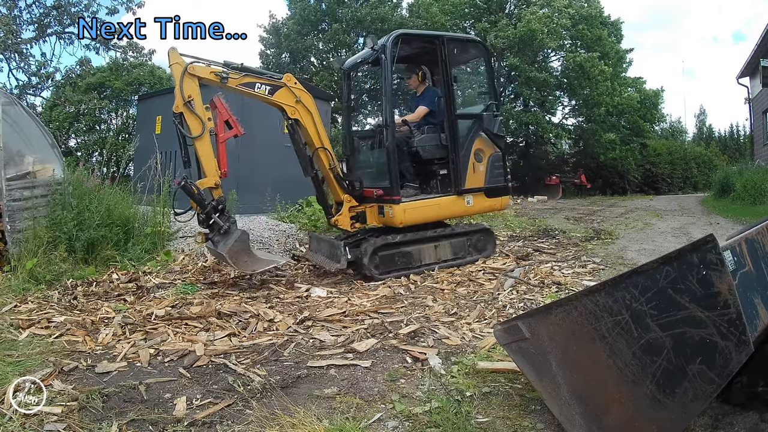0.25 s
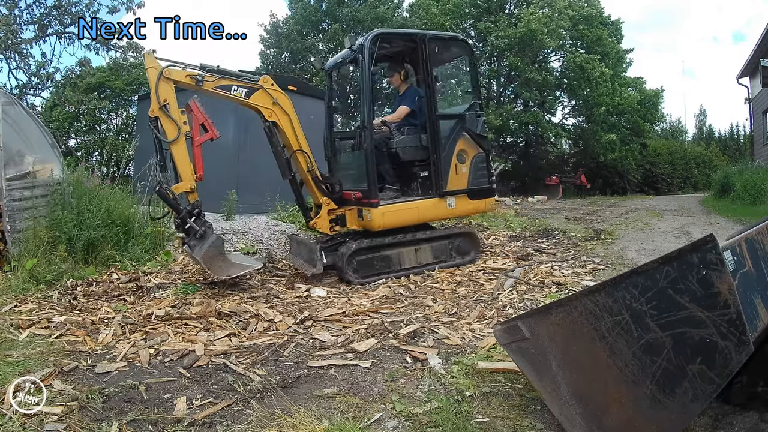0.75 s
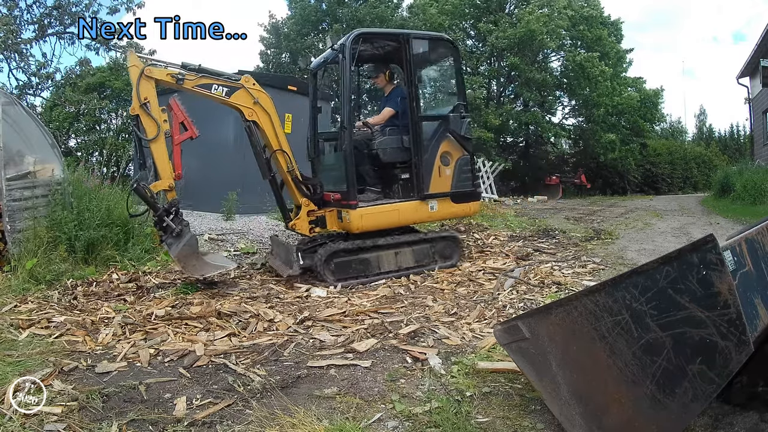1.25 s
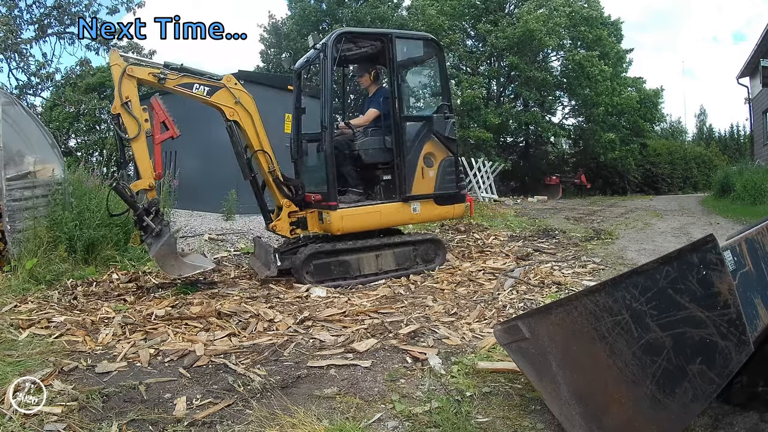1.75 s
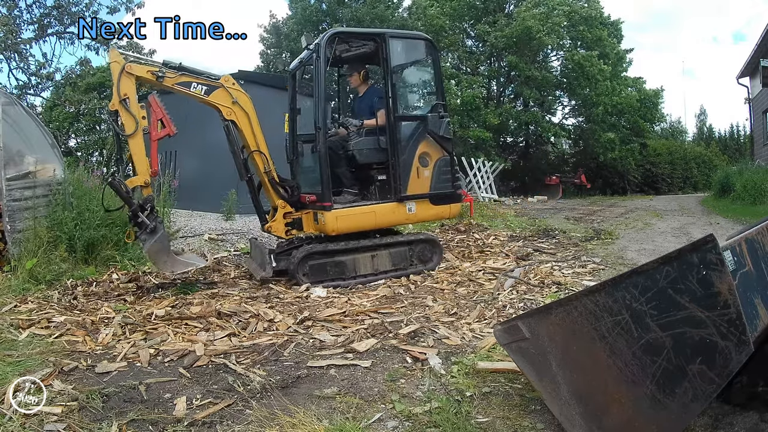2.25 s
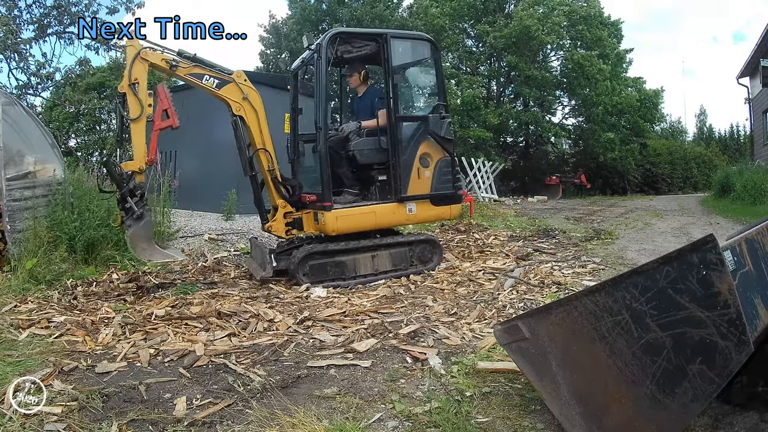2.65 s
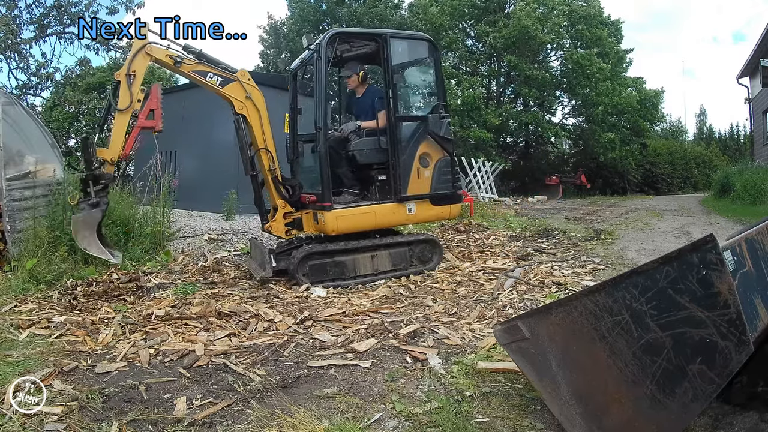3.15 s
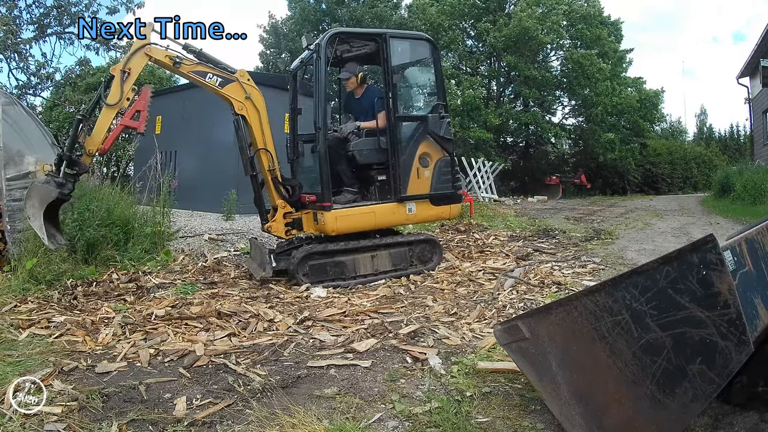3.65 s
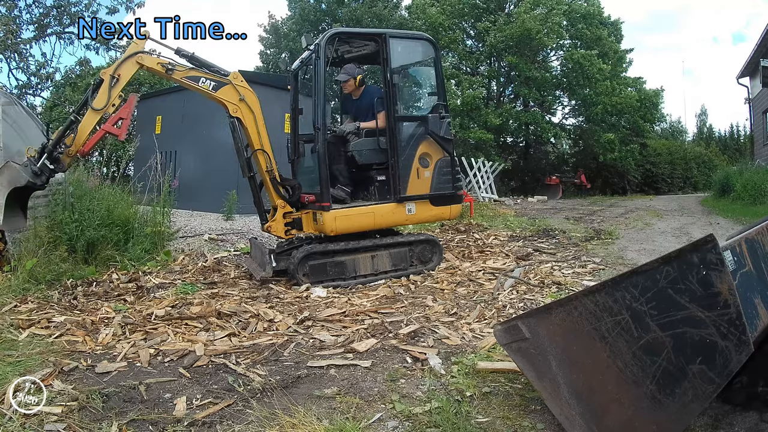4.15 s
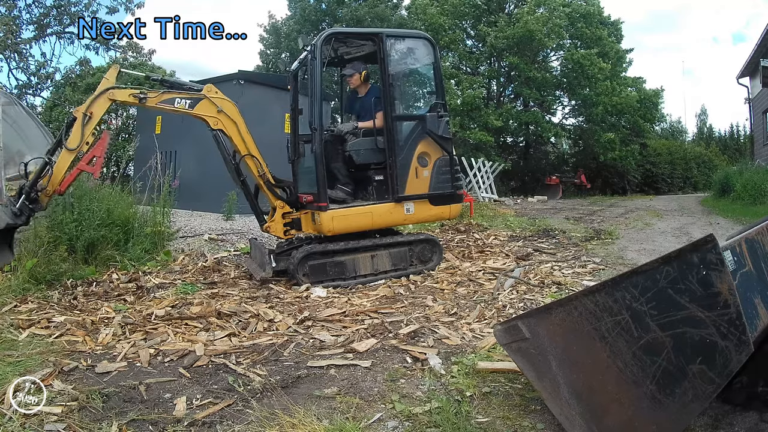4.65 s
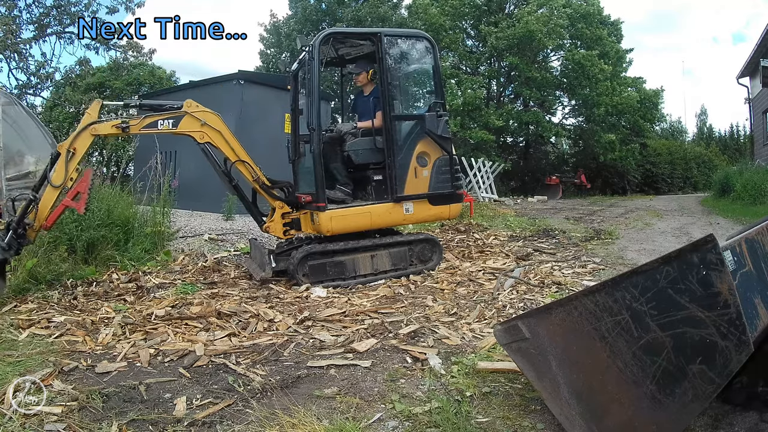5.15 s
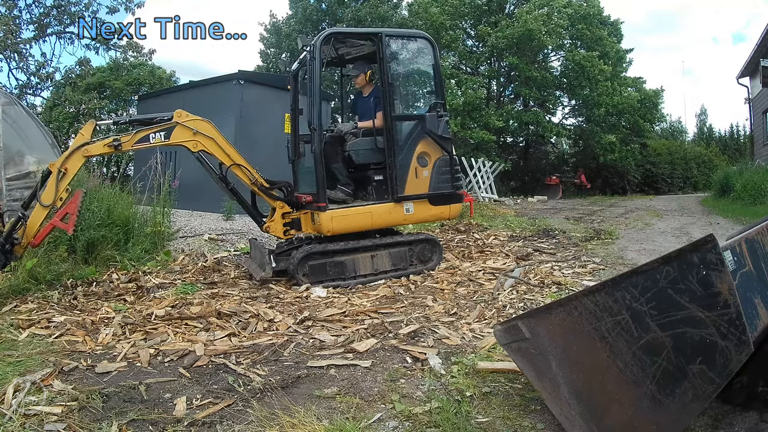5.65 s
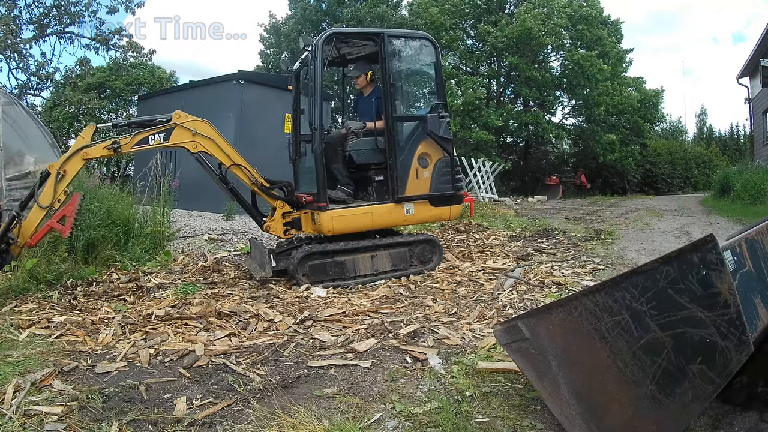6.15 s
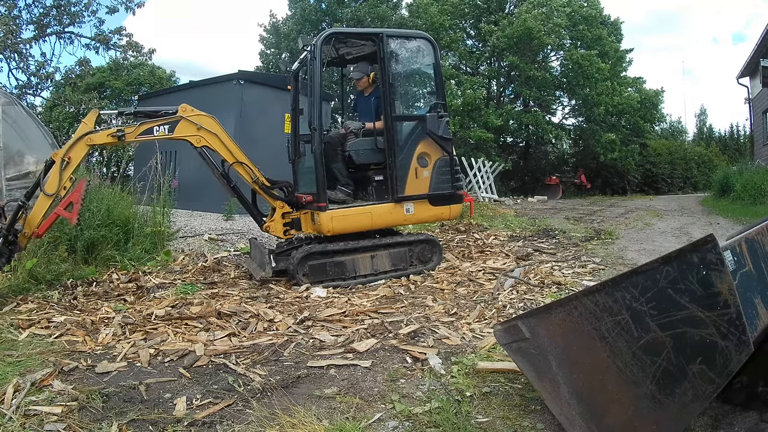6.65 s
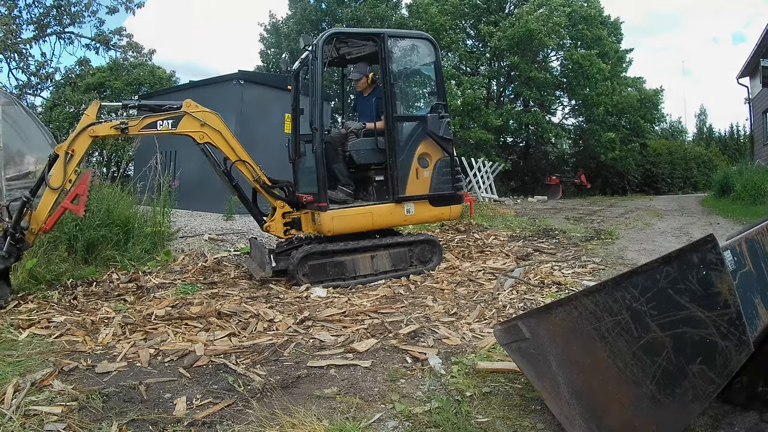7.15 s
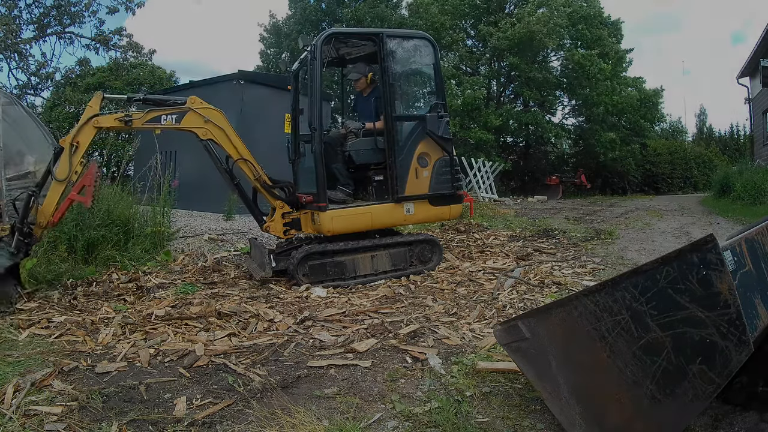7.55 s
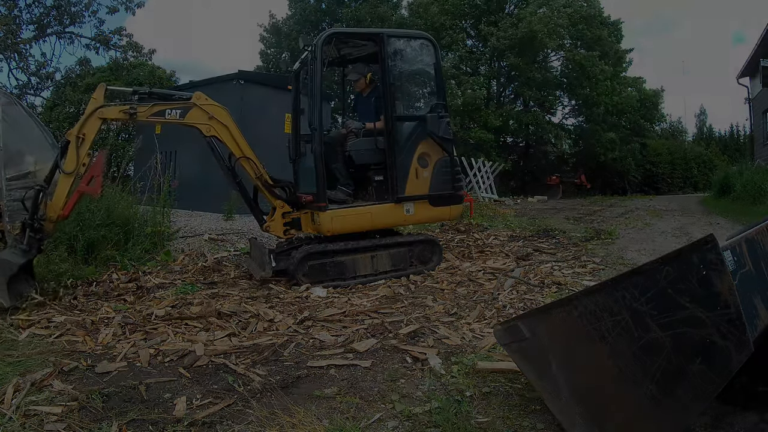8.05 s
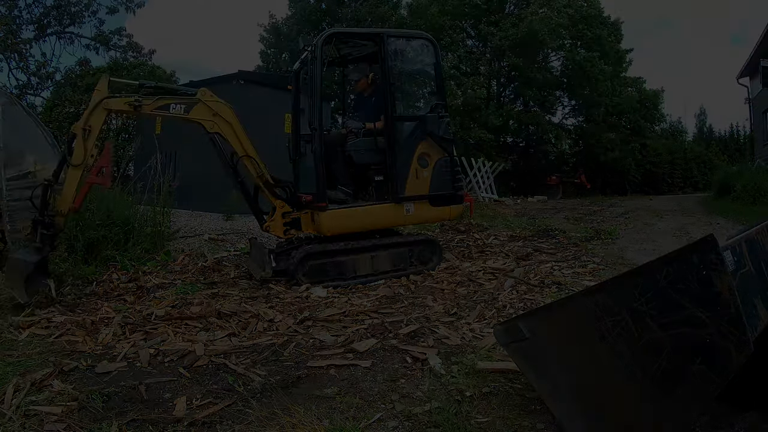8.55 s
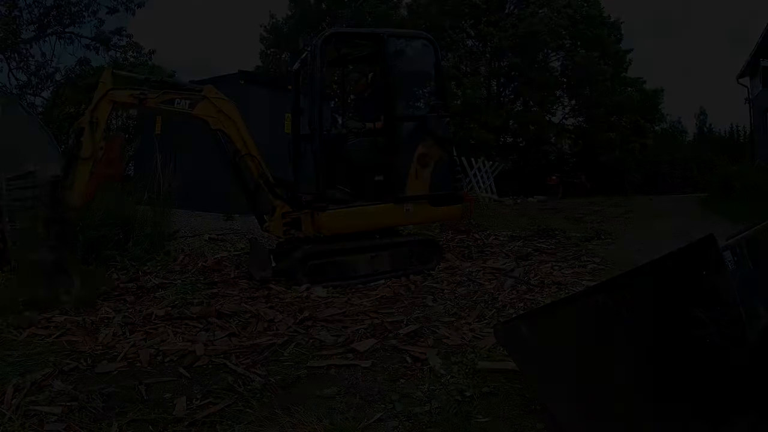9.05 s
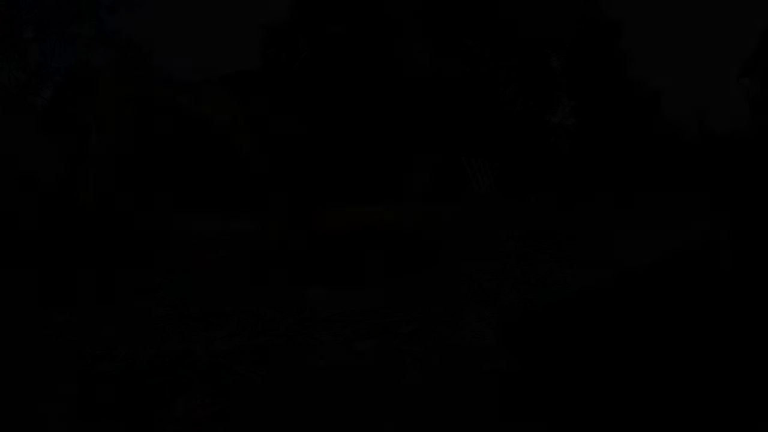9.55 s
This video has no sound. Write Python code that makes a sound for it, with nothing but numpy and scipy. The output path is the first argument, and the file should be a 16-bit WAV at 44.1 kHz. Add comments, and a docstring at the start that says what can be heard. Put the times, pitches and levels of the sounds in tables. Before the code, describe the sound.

Outdoors, a compact digger's diesel clatters at a steady medium-low speed, dipping slightly under load. Over the first two seconds splintering wood, hollow board knocks and loose steel links sound under the bucket. Soon after, the bucket rattles and clanks on its pins with dull boom thumps. The engine then carries on almost alone, with soft jolts and weak rattles later, and fades nearly to silence. Heard from nearby, fairly dry, with slight reflections from sheds and trees.

```python
"""A three-cylinder diesel excavator works in a yard; everything is built from tones and filtered noise.
From the start the exhaust sounds as tones of the engine cycle; the engine knocks and rings, the frame rumbles.
In the first seconds scraps of wood crack and knock under the raking bucket and loose steel links clink.
From 2.6 s the bucket clanks on its pins as it lifts, as noise and steel modes, with two low boom thumps.
Near 4.7 s a valve hisses faintly; late clanks follow, and the sound fades from 7.3 s, not quite to silence."""
import sys
import numpy as np
from scipy import signal
from scipy.fft import rfft, irfft
from scipy.io import wavfile
from scipy.ndimage import uniform_filter1d

SR = 44100
rng = np.random.default_rng(int(sys.argv[2]) if len(sys.argv) > 2 else 0)


def to_wav(sig):
    """Store sig (one row per channel, or 1-D mono) as 16-bit WAV at the path in sys.argv[1].

    Samples outside -1..1 are clipped; the rate is SR.
    """
    pcm = np.clip(np.atleast_2d(sig), -1, 1) * 32767
    pcm = np.round(pcm).astype(np.int16)
    wavfile.write(sys.argv[1], SR, pcm.T)  # frames by channels


N = 431290
TIME = np.arange(N) / SR  # s

# Speed of the crankshaft: time_s, speed_rpm
CRANK_SPEED = [(0.0, 1407.4), (1.01, 1424.0), (1.16, 1383.6), (1.74, 1407.7), (2.1, 1506.9), (2.25, 1359.2),
               (2.55, 1418.1), (2.68, 1295.9), (2.85, 1370.2), (2.98, 1372), (3.11, 1347), (3.26, 1368),
               (3.42, 1353.5), (3.95, 1338.1), (4.32, 1400.3), (4.78, 1379.0), (4.98, 1402.0),
               (5.87, 1386.7), (6.05, 1462.5), (6.41, 1345.3), (6.9, 1398.2), (7.55, 1351.4),
               (7.82, 1375.8), (9.78, 1371.9)]
START_PLACE = -.068  # engine cycles
# The governor lets the revs droop under the pump's load, so the speed tells how hard the engine works.
WORKING_RPM, LOAD_DB_PER_RPM = 1393.6, 0.06
IDLE_DB, FULL_DB = -5, 3  # load with the pump unloaded, and at its relief pressure
# Exhaust tones before load and shading: order (multiple of the four-stroke cycle rate; firing is every third),
# level_db (rms), load_gain (share of the amplitude gained per dB of load)
EXHAUST_TONES = [(3, -40.5, -.1), (4, -47.5, .25), (5, -40.5, .28), (6, -17, .018), (7, -35, .12),
                 (8, -39, -.05), (9, -31.8, .33), (10, -52, 0), (11, -50, -.25), (12, -38.5, .2),
                 (13, -43.5, -.05), (14, -41, -.08), (15, -26.8, .13), (18, -43.7, .12), (19, -49.5, .1),
                 (21, -36.2, .07), (24, -38.8, .12), (25, -52, .06), (27, -46, .04), (30, -50, -.12),
                 (33, -44.5, -.03), (36, -52, .1), (45, -51, 0), (57, -53, 0)]
# The upper exhaust tones are shaded, less and less, until the cab has swung round.
SWING_S, SHADE_DB, SHADED_ORDER = 3.0, -8, 10.5  # shading sets in above this order, in full at twice it
# Blows in one engine cycle, levels relative: place_cycles, thud_db, knock_db, tick_db
CYCLE_BLOWS = [(.945, -3, -12, -14), (.05, -4, -8, -8), (.14, -12, -6, -9), (.3, -2, -5, -3),
               (.345, -4, -4, -8), (.45, -6, -7, -7), (.595, -4, -10, -12), (.64, -5, -2, -2),
               (.69, -3, -4, -8), (.755, -7, -6, -11)]
# Overall spectrum of the engine clatter, falling steeply above 5.2 kHz, relative:
# frequency_hz, density_db (per Hz)
CLATTER_SPECTRUM = [(100, -29), (220, -9.5), (330, -7), (400, -3), (465, -9), (620, -4), (780, -8.5),
                    (1300, -9.5), (2000, -12), (2500, -18), (3300, -25.5), (5200, -31), (5550, -40.5),
                    (9100, -40), (10300, -58)]
# Resonances and hollows of the covers: frequency_hz, width_hz, gain_db
COVER_RESONANCES = [(535, 63, 5), (640, 40, 5), (970, 25, 4.5), (1050, 60, 5), (1135, 30, 3),
                    (1290, 30, -1.5), (1430, 30, -1.5), (1510, 43, 7), (1590, 30, -2), (1820, 400, 3.3),
                    (2230, 50, -2.5), (2320, 60, 2.5), (2410, 50, -3), (2820, 220, 1.5), (3180, 100, -2),
                    (3880, 180, 4.8), (4044, 60, 3.5), (4330, 80, -3.5), (4700, 200, 3.5),
                    (4840, 100, -3.5)]
CLATTER_DB, CLATTER_PER_LOAD = -38.1, 0.43  # level at zero load, and dB gained per dB of load
# Engine parts that ring once a cycle, before load and scatter:
# place_cycles, frequency_hz, peak_db (relative), peak_ms (time to the peak)
PART_RINGS = [(.055, 4400, -59, 1.6), (.94, 550, -35.5, 3.2), (.3, 640, -34.5, 2.8), (.305, 1040, -40, 3.0),
              (.3, 2820, -47, 1.9), (.335, 5120, -58, 2.8), (.36, 1850, -43.5, 2.4), (.415, 760, -42, 3.0),
              (.585, 520, -40, 3.4), (.642, 1010, -33.8, 3.0), (.645, 2960, -49, 2.4),
              (.635, 4400, -57.5, 1.8), (.665, 5150, -57, 2.6), (.695, 1830, -37.7, 2.3),
              (.765, 2050, -37.7, 1.6)]
# The parts rattle as they ring: line width as a share of the pitch, growing with pitch up to this frequency.
RING_WIDTH, RING_WIDTH_HZ = .025, 3000
# Steady rumble of the frame, relative: frequency_hz, density_db (per Hz)
RUMBLE_COLOUR = [(12, -9), (28, 6), (75, 3.5), (125, 0.5), (175, -2.5), (260, -6), (450, -14), (900, -64.5),
                 (4000, -87)]
SHUDDER_DB, JOLT_RISE_S = -37.5, 0.075  # rms of the rumble; e-fold time of a jolt's growth
# Jolts as the boom starts and stops: peak_s, level_db, decay_s (e-fold time)
BOOM_JOLTS = [(0.348, -33, 0.41), (1.171, -26, 0.27), (2.17, -43, 0.2), (2.619, -21, 0.16),
              (5.598, -44, .4), (6.15, -33, 0.29), (6.42, -27, 0.53), (6.92, -29, 0.091)]
# Shaking under a jolt, relative: frequency_hz, density_db (per Hz)
SHAKING_COLOUR = [(12, -10), (28, 4), (55, -2), (85, 2), (140, 3), (200, 1), (280, -4), (450, -15),
                  (900, -60), (4000, -87)]
# Wood snapping and scraping under the bucket: start_s, level_db, centre_hz, spread_octaves, t60_s
WOOD_CRACKS = [(.233, -42, 2400, 0.38, .025), (.29, -30.5, 1000, 0.52, 0.12), (0.35, -34, 1380, 1.2, 0.062),
               (0.403, -37, 1490, 0.3, 0.2), (0.536, -32, 1400, 0.5, 0.07), (.598, -43, 2660, 0.62, 0.054),
               (.82, -36, 1200, 0.68, 0.035), (0.866, -40, 3230, 0.8, 0.1), (0.882, -22, 1500, 0.7, 0.03),
               (1.292, -29.5, 813, 0.65, 0.062), (1.436, -26, 1950, 0.45, 0.03),
               (1.598, -33, 1400, 0.68, 0.04), (1.657, -33.5, 900, 0.73, 0.099),
               (2.351, -31, 1100, 0.74, 0.045)]
SPLINTERS_PER_S = 3500
# Boards knocking together: start_s, level_db, pitch_hz, t60_s
BOARD_KNOCKS = [(.035, -32, 736, .05), (.072, -30, 790, .05), (.262, -18, 805, .055), (.404, -32, 1540, .1),
                (.432, -30, 2780, .065), (.498, -29, 860, .07), (.532, -26, 1120, .07),
                (.547, -28, 700, .05), (.549, -31, 1500, .05), (.629, -30, 780, .06), (.737, -29, 850, .06),
                (.819, -31, 900, .04), (.883, -23, 1100, .04), (.965, -26, 780, .05),
                (1.192, -28, 743, .07), (1.384, -25, 690, .05), (1.437, -21.5, 2008, .04)]
# Modes of a board: ratio (multiple of its pitch), level_db (relative)
BOARD_MODES = [(1, 0), (1.13, -10), (1.58, -13), (2.45, -22)]
# Loose steel links clinking at the bucket: start_s, level_db, tilt_db (per octave)
LINK_CLINKS = [(0.293, -41, -6), (.301, -28, -13), (.867, -31, -1), (0.884, -31.5, 3), (1.13, -19, -3),
               (1.156, -26, 1), (1.168, -34, 0), (1.189, -27.5, -5), (1.246, -36, 1), (1.289, -37, 8),
               (1.3, -35.5, 9), (1.323, -36, 5)]
# Ringing of the links, before tilt: frequency_hz, level_db (relative), t60_s
LINK_MODES = [(2482, -14, .04), (2860, -11, .05), (3480, -4, .025), (3900, -2, .03), (4030, -7, .05),
              (4700, -10, .025), (5184, -8, .04), (5380, -11, .04)]
# Gritty contact between links, before tilt: frequency_hz, density_db (per Hz, relative)
CONTACT_COLOUR = [(1000, -20), (2800, -3.5), (3200, -10), (3850, 3), (4400, -8), (5200, -4), (6000, -12),
                  (6800, -15), (8500, -14.5), (9500, -19), (10300, -34), (14000, -52.5)]
# Bucket and linkage striking their pins:
# start_s, rattle_db, ring_db, tilt_db (per octave), edge_hz (upper edge of the rattle), t60_s (of the rattle)
PIN_CLANKS = [(2.572, -35, -54, -7.5, 3000, .12), (2.595, -28.5, -49, -1.5, 7060, 0.1),
              (2.616, -24.5, -43, -1.5, 6500, 0.075), (2.677, -20.5, -36.5, -6, 4200, 0.095),
              (2.699, -25.5, -38.5, -4.5, 4200, 0.1), (2.757, -25, -41, -3, 4000, 0.08),
              (2.767, -24.5, -40, -.5, 3800, 0.065), (2.785, -29, -45, 1, 4220, 0.075),
              (4.06, -44.5, -64, 3, 7200, 0.18), (6.233, -51, -70, 7.5, 6440, 0.11),
              (6.495, -35, -54, -0.5, 5040, 0.19), (6.522, -31.5, -49, -1, 5000, 0.11),
              (6.62, -44, -64, 6, 5030, 0.1), (6.915, -46.5, -68, 5.5, 7050, 0.19),
              (6.995, -51.5, -72, 6, 7000, .1)]
# Rattle of a clank, before tilt and edge: frequency_hz, density_db (per Hz, relative)
RATTLE_COLOUR = [(100, -13.5), (450, -12.5), (800, -0.5), (1400, -4), (2100, -7.5), (2900, -7), (4300, -18),
                 (6800, -21), (8000, -52), (12000, -70.5)]
# Ringing of the steel bucket, before tilt and scatter: frequency_hz, level_db (relative), t60_s
BUCKET_MODES = [(505, -4, .6), (650, -1, .12), (727, -1, .25), (842, 3, .32), (924, 6, .28), (998, 2, .3),
                (1048, 0, .2), (1136, 1, .25), (1259, -2, .2), (1400, -3, .16), (1512, 1, .22),
                (1770, -4, .14), (2121, -6, .16), (2422, -6, .14), (2702, -5, .18), (2860, -8, .14),
                (2993, -9, .14), (4044, -18, .25)]
# Boom thumping as it takes up its slack: start_s, level_db, pitch_hz, t60_s
BOOM_THUMPS = [(2.572, -27, 250, .08), (2.596, -23.5, 235, .07)]
# Oil hissing through a valve as the arm reaches out: the flow peaks at VALVE_S
VALVE_S, VALVE_LENGTH_S, VALVE_DB, VALVE_HZ, VALVE_OCTAVES = 4.65, 0.63, -73.5, 8800, .1
# Response of the microphone: frequency_hz, gain_db
MICROPHONE_RESPONSE = [(5400, -0.5), (6100, -7), (6700, -1), (7600, -16), (8300, -2), (9000, -1.5),
                       (10200, -2), (12000, 4), (15000, -5.5)]
FADE_FROM, FADE_TO, EDGE_HZ = 7.27, 10.12, 15700  # s, s (beyond the end), upper band limit


def amp(db):
    """The decibel law: amplitude is ten to the power of dB / 20."""
    return 10 ** (np.asarray(db) / 20)


def unit(x):
    """Normalisation by mean power: scales to rms 1."""
    return x / np.sqrt(np.mean(x ** 2) + 1e-20)


def curve(rows):
    """Linear interpolation in time of a table of (s, value)."""
    return np.interp(TIME, *np.transpose(rows))


def read(points, hz):
    """Interpolation of a spectrum in dB along logarithmic frequency."""
    f, db = np.transpose(points)
    return np.interp(np.log(hz + 1), np.log(f), db)


def bins(x):
    """Harmonic analysis: the frequencies of the spectrum of x."""
    return np.fft.rfftfreq(len(x), 1 / SR)


def colour(x, db):
    """Linear filtering: a gain in dB for each frequency, then rms 1."""
    return unit(irfft(rfft(x) * amp(db), len(x)))


def wander(hz):
    """Band-limited chance: noise up to the given rate, rms 1."""
    noise = rng.standard_normal(N)
    return unit(irfft(rfft(noise) * (bins(noise) < hz), N))


def add(mix, s, sound):
    """Superposition: adds a sound into the mix at a given second."""
    part = mix[max(round(s * SR), 0):][:len(sound)]
    part += sound[:len(part)]


def above(hz, edge_hz):
    """Low-pass law: the steep fall in dB above an edge."""
    return -10 * np.log10(1 + (hz / edge_hz) ** 14)


def burst(drive, shape_db, t60):
    """Minimum-phase resonance: a dying excitation sounds through a body's gain, starting at about rms 1."""
    n = len(drive)
    envelope = amp(-60 * TIME[:n] / t60)
    cepstrum = irfft(np.log(amp(np.maximum(shape_db, -100))), n)
    # folding the cepstrum into its first half makes the body respond at once
    body = np.exp(rfft(2 * cepstrum * (np.arange(n) < n // 2)))
    return unit(irfft(rfft(drive * envelope) * body, n)) * np.sqrt(np.mean(envelope ** 2))


def exhaust(cycles, load_db, pipe_q=4, lead=0.021, waver=0.046, restless=0.083):
    """Harmonic sum: lower firing harmonics are phase-locked; upper and between tones wander in phase and level."""
    out, strength = np.zeros(N), 1 + waver * wander(12)
    shade_db = SHADE_DB * np.clip(1 - TIME / SWING_S, 0, 1)
    for order, db, gain in EXHAUST_TONES:
        if order in (3, 6, 9, 12, 15, 18):
            # the pipe resonates at twice the firing rate: tones below it lead, tones above it lag
            detune = order / 6 - 6 / order
            early = (order - 6) * lead  # cycles by which the pulse's steep front brings upper tones forward
            tone = np.cos(2 * np.pi * (order * cycles + early) - np.arctan(pipe_q * detune)) * strength
        else:
            phase = 2 * np.pi * (order * cycles + rng.random()) + restless * wander(1.8)
            tone = np.cos(phase) * (1 + restless / 2 * wander(3))
        shaded_db = db + shade_db * np.clip(order / SHADED_ORDER - 1, 0, 1)
        out += np.sqrt(2) * amp(shaded_db) * (1 + gain * load_db) * tone
    return out


def blows(cycles, levels_db, decay, between_db, repeat, scatter_db, rise=0.024, jitter=0.0077):
    """Cyclic excitation: bursts of noise (rise, decay, jitter in cycles), a power share 'repeat' alike each cycle."""
    envelope = np.full(N, amp(between_db) ** 2)  # holds power until the root below
    place = cycles + jitter * wander(13)
    for row, db in zip(CYCLE_BLOWS, levels_db):
        turn, age = np.divmod(place - row[0] + 2, 1)
        force = amp(db + scatter_db * rng.uniform(-1, 1, size=200))[turn.astype(int)]
        envelope += (force * (1 - np.exp(-age / rise)) * np.exp(-age / decay)) ** 2
    ring = signal.resample(rng.standard_normal(size=2048), 16384)
    alike = ring[(cycles % 1 * len(ring)).astype(int)]
    fresh = rng.standard_normal(N)
    return unit(np.sqrt(envelope) * (np.sqrt(repeat) * alike + np.sqrt(1 - repeat) * fresh))


def clatter(cycles, load_db, thud_hz=750, tick_hz=2500, thud_per_load=0.067):
    """Source and filter: thuds, knocks and ticks take on an overall spectrum and the covers' resonances."""
    _, thud_db, knock_db, tick_db = np.transpose(CYCLE_BLOWS)
    thud = blows(cycles, thud_db, decay=0.034, between_db=-20.5, repeat=0.5, scatter_db=0.0)
    thud = thud * amp(thud_per_load * load_db)  # combustion hits harder under load
    # piston knock and injector ticks
    slap = blows(cycles, knock_db, decay=0.11, between_db=-9, repeat=0.3, scatter_db=3, rise=0.007)
    tick = blows(cycles, tick_db, decay=0.17, between_db=-6, repeat=0.25, scatter_db=4, rise=0.007)
    hz = bins(thud)
    # thuds fill the low band, knocks the middle and ticks the high one
    low = 1 / (1 + (hz / thud_hz) ** 6)
    high = 1 - 1 / (1 + (hz / tick_hz) ** 6)
    spectrum = rfft(thud) * np.sqrt(low)
    spectrum += rfft(slap) * np.sqrt((1 - low) * (1 - high))
    spectrum += rfft(tick) * np.sqrt(high)
    drive = irfft(spectrum, N)
    covers_db = sum(db / (1 + (2 * (hz - f) / width) ** 2) for f, width, db in COVER_RESONANCES)
    level = amp(CLATTER_DB + CLATTER_PER_LOAD * load_db)
    return level * colour(drive, read(CLATTER_SPECTRUM, hz) + covers_db)


def rings(cycles, load_db, level_db=-1.5, per_load=0.52, scatter_db=2.5, jitter_s=.00013, detune=.011):
    """Impulsive resonance: cylinders and valves set parts ringing at set places in the cycle, never quite alike."""
    out, t = np.zeros(N), TIME[:SR // 25]
    turns = np.arange(np.ceil(cycles[-1]))
    for place, hz, db, peak_ms in PART_RINGS:
        starts = np.interp(turns + place, cycles, TIME)
        age = t * 1000 / peak_ms
        envelope = amp(level_db + db) * age * np.exp(1 - age)
        width_hz = RING_WIDTH * min(hz / RING_WIDTH_HZ, 1) * hz
        for s, (size, late, pitch) in zip(starts, rng.standard_normal((len(starts), 3))):
            force = amp(scatter_db * size + per_load * load_db[int(s * SR)])
            # a random walk of the phase widens the spectral line
            blur = np.cumsum(rng.standard_normal(len(t))) * np.sqrt(2 * np.pi * width_hz / SR)
            blur = uniform_filter1d(blur, size=48)
            tone = np.sin(2 * np.pi * hz * (1 + detune * pitch) * t + blur)
            add(out, s + jitter_s * late, force * envelope * tone)
    return out


def shudder():
    """Forced vibration: frame and tracks rumble steadily; each boom jolt shakes the cab's panels and dies away."""
    power = 0
    for s, db, dying_s in BOOM_JOLTS:
        age = TIME - s
        power = power + (amp(db) * np.exp(np.minimum(age / JOLT_RISE_S, -age / dying_s))) ** 2
    steady, shaken = rng.standard_normal((2, N))
    hz = bins(steady)
    rumble = amp(SHUDDER_DB) * colour(steady, read(RUMBLE_COLOUR, hz))
    return rumble + np.sqrt(power) * colour(shaken, read(SHAKING_COLOUR, hz))


def crack(s, db, centre_hz, spread, t60, reach=2.6):
    """Random impulses through a resonance: splinters ring around a piece's pitch; small pieces reach higher."""
    n = SR // 5
    clicks = rng.standard_normal(n) * (rng.random(n) < SPLINTERS_PER_S / SR)
    hz = bins(clicks)
    widths_away = np.log2((hz + 1) / centre_hz) / spread
    shape_db = -20 * np.log10(1 + widths_away ** 2) + above(hz, np.clip(reach * centre_hz, 4000, 9000))
    return s, amp(db) * burst(clicks, shape_db, t60)


def knock(s, db, hz, t60, ring_db=-1.5, grit_db=-7, grit_spread=.28, rise_s=.0018):
    """Modal decay: a struck board rings, its upper modes dying sooner, while its splintered edge crunches."""
    _, grit = crack(s, grit_db, hz, grit_spread, t60, reach=1.4)
    t = TIME[:len(grit)]
    modes = 0
    for ratio, level in BOARD_MODES:
        envelope = amp(level - 60 * t * np.sqrt(ratio) / t60)
        modes = modes + envelope * np.sin(2 * np.pi * (hz * ratio * t + rng.random()))
    return s, amp(db) * (np.sqrt(2) * amp(ring_db) * modes + grit) * (1 - np.exp(-t / rise_s))


def wood(rake_from=0, rake_to=1.8, chips_db=-40.5, chip_spread=0.3, drag_db=-39.5, drag_hz=500,
         drag_range=3.0, drag_t60=.2, count=46):
    """Superposed impacts: single pieces, and chips tumbling and boards bumping while the bucket rakes."""
    out = np.zeros(N)
    for row in WOOD_CRACKS:
        add(out, *crack(*row))
    for row in BOARD_KNOCKS:
        add(out, *knock(*row))
    starts = rake_from + (rake_to - rake_from) * rng.random((count, 2))
    for (chip_s, bump_s), (size, pitch) in zip(starts, rng.random((count, 2))):
        add(out, *crack(chip_s, chips_db + 7 * size - 6 * pitch, 1100 * 3 ** pitch, chip_spread, 0.02))
        add(out, *crack(bump_s, drag_db + 5 * size, drag_hz * drag_range ** (pitch - .5), .22, drag_t60))
    return out


def clink(s, db, tilt_db, ring_db=-7.5, contact_db=-3, contact_t60=0.024, tail_db=-22, tail_t60=0.18,
          centre_hz=4200):
    """Contact and modal decay: steel meets steel with brief grit and a jangling tail, and the link rings."""
    t = TIME[:SR // 5]
    ring = 0
    for f, level, life in LINK_MODES:
        envelope = amp(level + tilt_db * np.log2(f / centre_hz) - 60 * t / life)
        ring = ring + envelope * np.sin(2 * np.pi * (f * t + rng.random()))
    hz = bins(t)
    shape_db = read(CONTACT_COLOUR, hz) + tilt_db * np.log2((hz + 1) / centre_hz)
    contact = burst(rng.standard_normal(len(t)), shape_db, contact_t60)
    tail = burst(rng.standard_normal(len(t)), shape_db, tail_t60)
    mixed = amp(ring_db) * ring + amp(contact_db) * contact + amp(tail_db) * tail
    return s, amp(db) * mixed * (1 - np.exp(-t / .0005))


def links(rattle_from=1.14, rattle_to=1.2, rattle_db=-49, range_db=8, tilt_db=4, count=16):
    """Repeated impact: clear clinks one by one; the hardest leaves the links rattling for a moment."""
    out = np.zeros(N)
    for row in LINK_CLINKS:
        add(out, *clink(*row))
    for when, size in rng.random((count, 2)):
        start_s = rattle_from + (rattle_to - rattle_from) * when
        add(out, *clink(start_s, rattle_db + range_db * size, tilt_db))
    return out


def bucket(grit=0.23, rise_s=0.0036, ring_tilt=.5):
    """Modal excitation: each blow on the pins rattles and rings the steel in a new mix; the boom thumps below."""
    out, t = np.zeros(N), TIME[:SR]
    for s, db, ring_db, tilt_db, edge_hz, t60 in PIN_CLANKS:
        chatter = np.exp(grit * np.repeat(rng.standard_normal(size=SR // 100), 100))
        noise = rng.standard_normal(len(t)) * chatter * (1 - np.exp(-t / rise_s))
        hz = bins(noise)
        shape_db = read(RATTLE_COLOUR, hz) + tilt_db * np.log2(hz / 1000 + 0.064) + above(hz, edge_hz)
        add(out, s, amp(db) * burst(noise, shape_db, t60))
        ring = 0
        for f, level, life in BUCKET_MODES:
            mode_db = level + 2 * rng.standard_normal() + ring_tilt * tilt_db * np.log2(f / 1000)
            ring = ring + amp(mode_db - 60 * t / life) * np.sin(2 * np.pi * (f * t + rng.random()))
        add(out, s, amp(ring_db) * ring * (1 - np.exp(-t / 0.0016)))
    for s, db, hz, t60 in BOOM_THUMPS:
        thump = np.sqrt(2) * amp(db - 60 * t / t60) * np.sin(2 * np.pi * hz * t)
        add(out, s, thump * (1 - np.exp(-t / rise_s)))
    return out


def valve():
    """Flow noise: a thin, high band of hiss swells and sinks with the flow of oil."""
    noise = rng.standard_normal(N)
    widths_away = np.log2((bins(noise) + 1) / VALVE_HZ) / VALVE_OCTAVES
    flow = np.exp(-((TIME - VALVE_S) / VALVE_LENGTH_S) ** 2)
    return amp(VALVE_DB) * flow * colour(noise, -20 * np.log10(1 + widths_away ** 2))


def yard(x, echo_db=-11, t60=0.14):
    """Scattering: sheds and trees return a thin, short echo as sparse, dying reflections."""
    t = TIME[:SR // 2]
    sparse = rng.standard_normal(len(t)) * (rng.random(len(t)) < 1500 / SR)  # 1500 reflections per s
    taps = sparse * (t > .008) * amp(-60 * t / t60)
    return x + amp(echo_db) * signal.fftconvolve(x, taps / np.linalg.norm(taps))[:N]


def scene():
    """Four-stroke timing: one cycle takes two turns of the crank; the load follows from the droop of the revs."""
    rpm = curve(CRANK_SPEED)
    cycles = START_PLACE + np.cumsum(rpm) / (2 * 60) / SR
    load_db = np.clip(LOAD_DB_PER_RPM * (WORKING_RPM - rpm), IDLE_DB, FULL_DB)
    engine = exhaust(cycles, load_db) + clatter(cycles, load_db) + rings(cycles, load_db)
    impacts = yard(wood() + links() + bucket())
    return (engine + shudder() + impacts + valve())[None]


def record(dry):
    """Transducer response: the microphone's colour, a straight fade, then a linear-phase band limit."""
    heard = irfft(rfft(dry[0]) * amp(read(MICROPHONE_RESPONSE, bins(dry[0]))), N)
    faded = heard * np.clip((FADE_TO - TIME) / (FADE_TO - FADE_FROM), 0, 1)
    low_pass = signal.firwin(511, EDGE_HZ, window=("kaiser", 9), fs=SR)
    return signal.oaconvolve(faded, low_pass, "same")[None]


dry = scene()
out = record(dry)
to_wav(out)
```